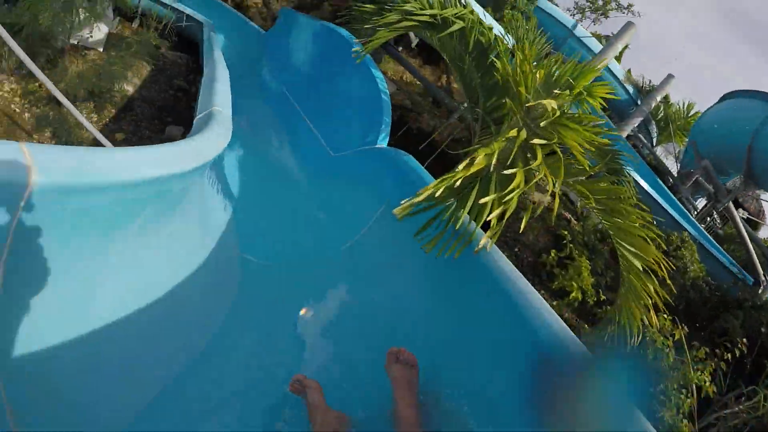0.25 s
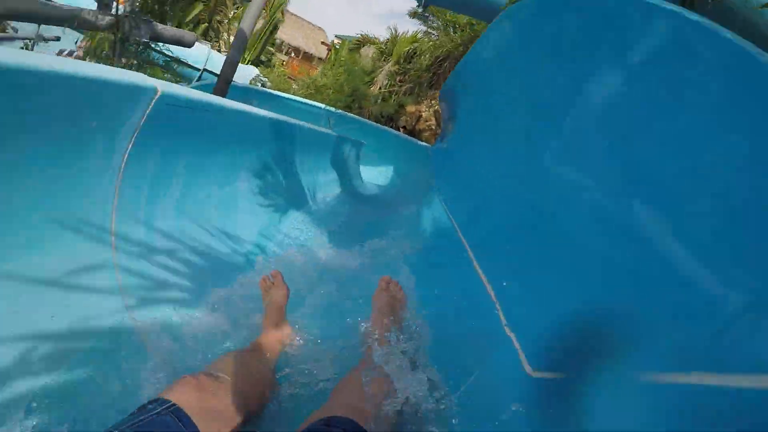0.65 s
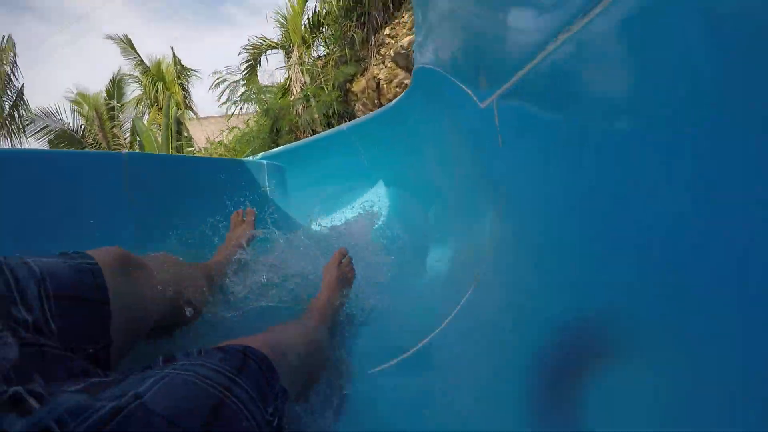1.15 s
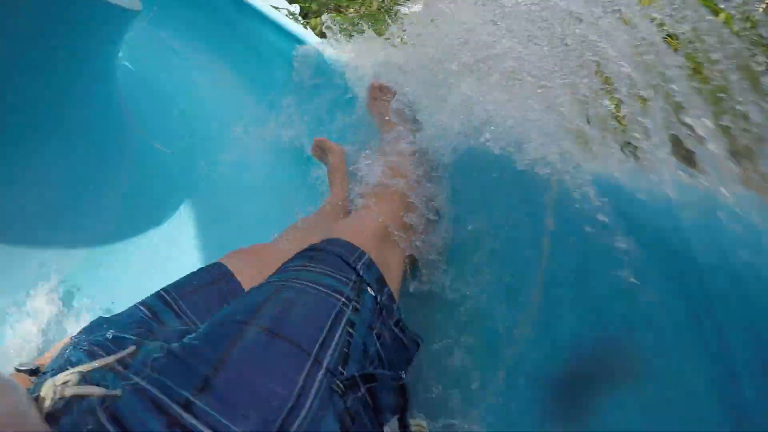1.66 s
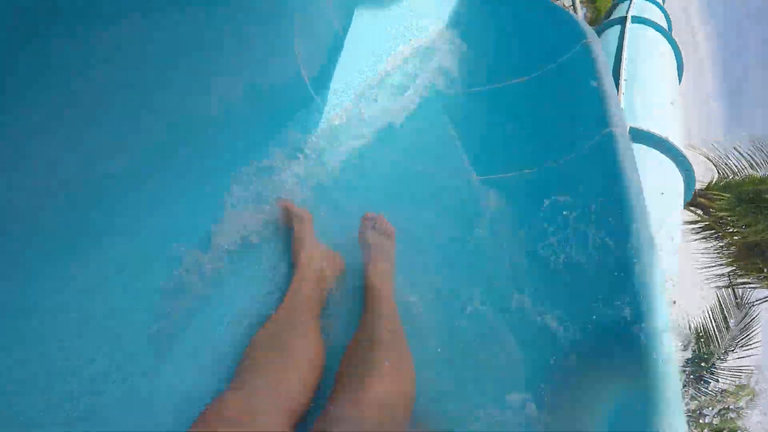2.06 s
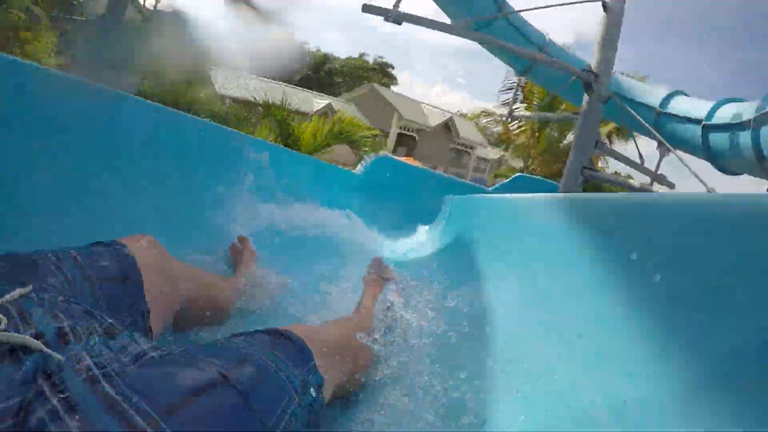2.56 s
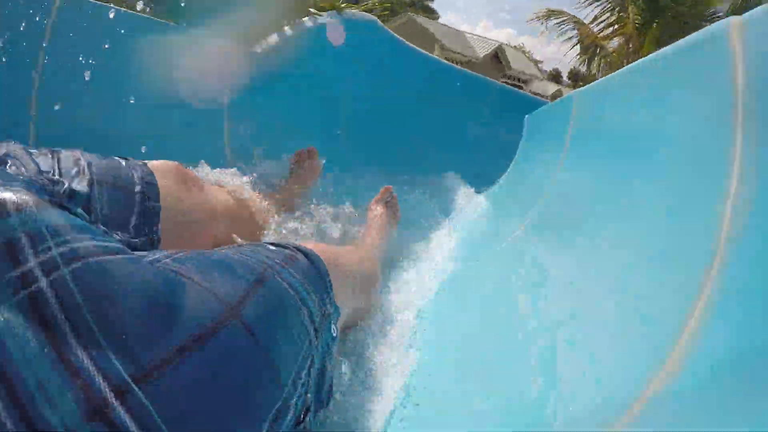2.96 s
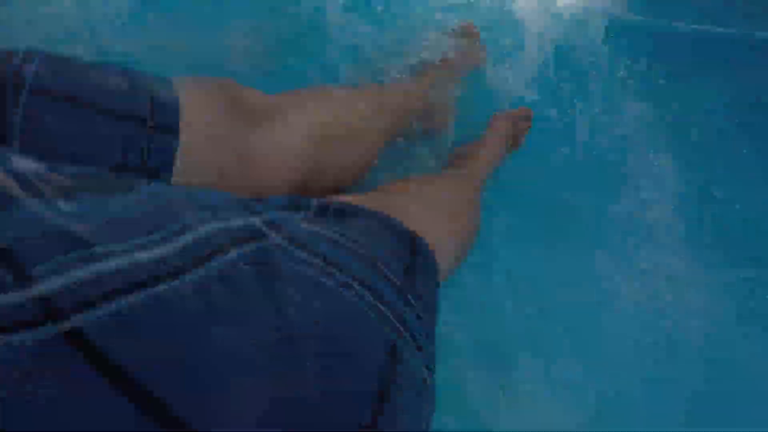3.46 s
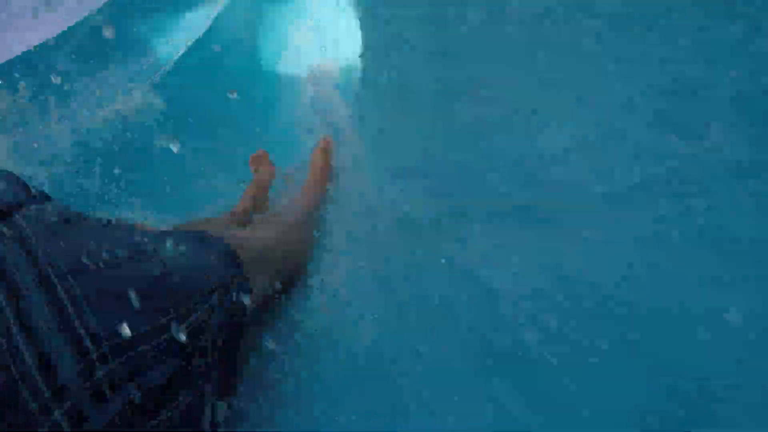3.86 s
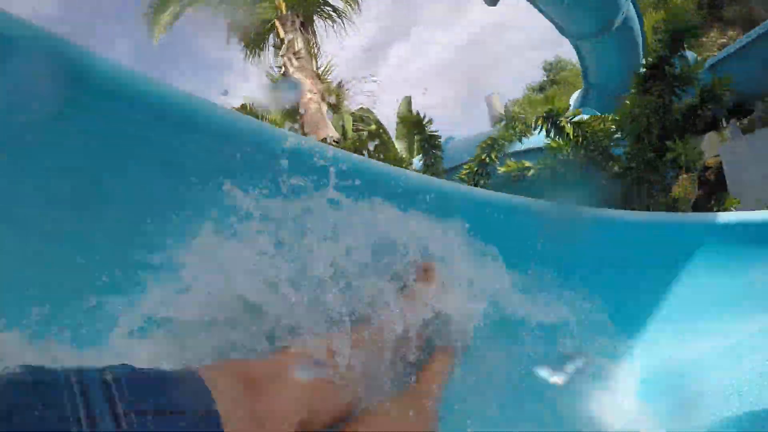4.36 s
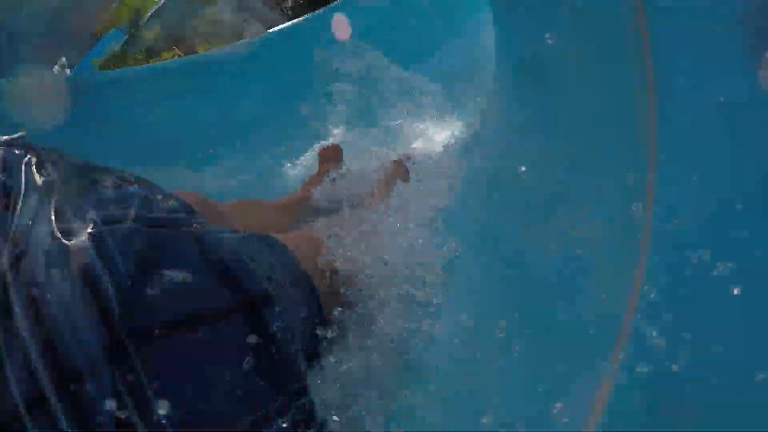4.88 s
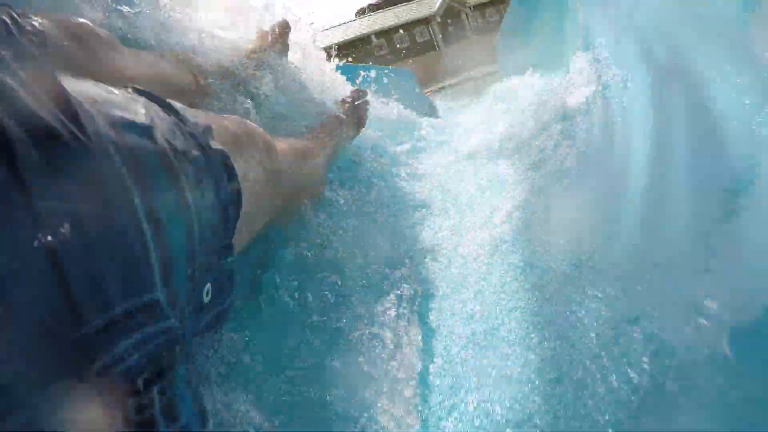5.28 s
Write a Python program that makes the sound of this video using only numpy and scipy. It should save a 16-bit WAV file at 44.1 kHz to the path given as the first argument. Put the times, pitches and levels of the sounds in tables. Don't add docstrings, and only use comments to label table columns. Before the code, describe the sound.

Outdoors on a water slide, heard at arm's length through a muffling case: constant uneven water rush with bubbles and spray. Deep pole thuds and short mount rattles hit hard after one second, again near two and a half, and thickest around three and a half. A momentary smothering follows, then a bright wet snap just after four seconds, and more bumps and splashing.

```python
import sys
import numpy as np
from scipy import signal
from scipy.fft import rfft, irfft, next_fast_len
from scipy.io import wavfile
from scipy.ndimage import uniform_filter1d, map_coordinates

SR = 44100
rng = np.random.default_rng(int(sys.argv[2]) if len(sys.argv) > 2 else 0)


def unload_wav(signal):
    wavfile.write(
        sys.argv[1],
        SR,
        np.round(np.clip(np.atleast_2d(signal).T, -1, 1) * 32767).astype(np.int16),
    )


def voltage_ratio(level):
    return 10 ** (np.asarray(level, float) / 20)


N = 243431


def unit(x):
    return x / np.sqrt(np.mean(x ** 2) + 1e-20)


def curves(rows):
    s, *cols = np.transpose(rows)
    return [np.interp(np.arange(N) / SR, s, c) for c in cols]


def wobble(rate):
    knots = rng.standard_normal(1200)
    return map_coordinates(knots, [np.arange(N) * rate / SR])


def coloured(x, spectrum):
    m = next_fast_len(N + 8192)
    hz, db = np.transpose(spectrum)
    gain = voltage_ratio(np.interp(np.log(np.fft.rfftfreq(m, 1 / SR) + 1), np.log(hz + 1), db))
    return unit(irfft(rfft(x, m) * gain, m)[:N])


def ring(t, hz, t60, attack):
    return np.sin(2 * np.pi * hz * t) * voltage_ratio(-60 * t / t60) * (1 - np.exp(-t / attack))


def add(track, s, sound):
    track[round(s * SR):][:len(sound)] += sound


def hush_db():
    t = np.arange(N) / SR
    covered_s, clear_s, edge_s = 3.79, 3.93, 0.015
    covers = 0.5 + 0.5 * np.tanh((t - covered_s) / edge_s)
    clears = 0.5 + 0.5 * np.tanh((t - clear_s) / edge_s)
    recovery_db = -5 * clears * np.exp(-np.abs((t - clear_s) / 0.06))
    return -15 * (covers - clears) + recovery_db


# time in seconds, shaking in dB,
# roughness of the slide in dB.
POLE = [(0, -29.5, -17), (.45, -23.5, -28), (.74, -22.5, 8.5), (1.29, -17, -17), (1.45, -39, 7),
        (1.6, -13, -12), (1.94, -36.5, -13), (2.4, -12.5, 0.5), (2.6, -26, 1), (2.89, -32, 1.5),
        (3.35, -19, 1), (3.56, -18, 5), (3.8, -25, 8), (4.12, -20, 6.5), (4.42, -38.5, 11.5),
        (4.64, -17, 1), (4.88, -29.5, 6.5), (5.52, -22, 0)]
# frequency in Hz, level in dB per Hz.
SWAY = [(4.7, -6), (8.0, 7.5), (43, 4.5), (62, -3), (90, -9), (120, -16), (200, -120)]
# frequency in Hz, level in dB per Hz.
SHUDDER = [(32, -14.5), (55, -11.5), (100, -16), (124, -22), (167, -20.5), (221, -19), (262, -39),
           (320, -45), (420, -31.5), (700, -120)]


def pole():
    sway_db, rough_db = curves(POLE)
    sway_db = sway_db + 0.78 * hush_db()
    shudder_db = sway_db + rough_db - 15.5
    sway = voltage_ratio(sway_db - 3.5 + 1.9 * wobble(35)) * coloured(rng.standard_normal(N), SWAY)
    shudder = voltage_ratio(shudder_db - 3.5 + 4.6 * wobble(21.98)) * coloured(rng.standard_normal(N), SHUDDER)
    return sway + shudder


# crest in seconds, peak in dB, cycle in ms, t60 in seconds.
SWINGS = [(0.642, -10, 29.3, 0.69), (.73, -7, 21.7, 0.31), (0.8, -9, 19.8, 0.25),
          (1.022, -10.5, 30.4, 0.37), (1.035, -4.5, 8.1, 0.031), (1.067, -6, 27.7, 0.37),
          (1.142, -2, 33.4, 0.21), (1.289, -1.5, 14.3, 0.069), (1.398, -2, 21.6, 0.23),
          (1.563, -1.5, 22.5, 0.17), (1.677, -11.5, 18.4, 0.46), (1.735, -8, 24.5, 0.31),
          (2.398, -2, 20.5, 0.027), (2.412, -2, 26, 0.16), (2.541, -7, 45, 0.11), (3.122, -4.5, 24.7, 0.19),
          (3.211, -7.5, 28, 0.14), (3.344, -10, 32, 0.35), (3.553, -5.5, 29, 0.14), (3.595, -2, 29, 0.11),
          (3.638, -2.5, 44, 0.11), (3.71, -2.5, 18.8, 0.072), (3.793, -5, 16.7, 0.022),
          (4.22, -8.5, 31.5, 0.1), (4.594, -1.5, 34.7, 0.22), (4.758, -3, 34, 0.079),
          (5.05, -5, 29.3, 0.39), (5.284, -10, 25, 0.31), (5.381, -1.5, 24, 0.18), (5.45, -6, 38, 0.091)]
# crest in seconds, peak in dB, cycle in ms.
LURCHES = [(0.037, -16.5, 33), (0.23, -18.5, 43), (0.432, -16, 34), (0.502, -8, 30.3), (0.564, -13, 46),
           (0.684, -10, 34), (0.767, -4, 35), (0.909, -18, 37), (.97, -20, 13), (1.191, -13, 51),
           (1.272, -11.5, 71), (1.346, -11, 33), (1.626, -22, 29), (1.657, -14, 28), (1.712, -21, 29),
           (1.843, -21.5, 52), (1.884, -18.5, 63), (2.12, -22, 62), (2.254, -22, 31), (2.291, -17.5, 37),
           (2.344, -11.5, 64), (2.451, -9, 68), (2.488, -9, 30), (2.943, -19.5, 31), (3.156, -21, 73),
           (3.279, -14, 40), (3.497, -32, 100), (3.741, -17, 51), (3.771, -20, 43), (3.961, -16.5, 43),
           (4.017, -21, 13), (4.071, -12, 25), (4.122, -18.5, 24), (4.163, -13, 23), (4.543, -19, 35),
           (4.627, -14, 40), (4.658, -31, 20), (4.716, -15, 73), (4.833, -24, 57), (4.978, -20, 26),
           (4.999, -12, 30), (5.135, -11.5, 36), (0.116, -24.5, 6.2), (2.0, -24.5, 46), (2.395, -5.5, 26),
           (3.418, -24, 7.2), (3.47, -30, 9.8), (3.514, -25, 9.3), (3.578, -10, 14), (5.03, -10.5, 8.3),
           (5.498, -24, 12), (0.136, -19.5, 30), (2.609, -21, 23), (3.9, -33, 30), (4.46, -26.5, 15),
           (5.326, -7.5, 46)]


def swings():
    lead = SR // 25
    out, t = np.zeros(N + SR), np.arange(-lead, SR // 3) / SR
    lurches = [(*row, 2.5 * row[2] / 1000) for row in LURCHES]
    for s, db, cycle_ms, t60 in SWINGS + lurches:
        turns = t / (cycle_ms / 1000) * (1 - 0.13 * np.tanh(t / 0.033))
        shape = np.where(t < 0, np.exp(-(1.83 * turns) ** 2), voltage_ratio(-60 * np.abs(t / t60)))
        add(out, s, voltage_ratio(db) * shape * np.cos(2 * np.pi * turns))
    return out[lead:][:N]


# start in seconds, peak in dB, case ring in dB re peak,
# cycle in ms.
JOLTS = [(0.114, -28, -14, 7.3), (0.475, -17.5, -31, 13.6), (1.0305, -8, -25, 7.4), (1.288, -4, -8.5, 5.75),
         (1.393, -11, -2, 4.1), (1.402, -9.5, -34, 9.2), (1.549, -16.5, -7, 10.5), (1.626, -31, -22, 1.6),
         (1.683, -25, -8, 4.5), (2.068, -37.5, 4, 4.5), (2.396, -25, 5, 3.8), (2.404, -3.5, -23, 5.67),
         (2.493, -20.5, 3.5, 6.2), (2.791, -32, 11, 6.6), (3.117, -22.5, 2, 5.3), (3.204, -22.5, -3, 3.46),
         (3.418, -22.5, -13, 5.3), (3.523, -25, -10, 6.1), (3.573, -13, -23, 7.5), (3.604, -10, 1.5, 4.9),
         (3.623, -21, -6, 4), (3.703, -4, -13, 6.2), (3.788, -9.5, -8.5, 4.54), (3.931, -21.5, -7, 7.5),
         (4.013, -15, 1, 9.2), (4.168, -15.5, 0, 10.6), (4.197, -24, -14, 5.2), (4.583, -20, -8, 9.8),
         (5.031, -25, -0.5, 4.7), (5.391, -21, -18, 3.87)]


def jolts():
    out, t = np.zeros(N + SR), np.arange(SR // 4) / SR
    case = ring(t, 222, t60=0.087, attack=0.014)
    for s, db, case_db, cycle_ms in JOLTS:
        t60 = (5.35 - 0.089 * db) * cycle_ms / 1000
        pitch = 1000 / cycle_ms * (0.5 + 0.5 * np.exp(-t / 0.013))
        snap = np.sin(2 * np.pi * np.cumsum(pitch) / SR) * voltage_ratio(-60 * t / t60) * (1 - np.exp(-t / 0.0048))
        add(out, s, -voltage_ratio(db + 12.5) * snap - voltage_ratio(db + case_db + 4.5) * case)
    return out[:N]


# start in seconds, peak in dB, main ring in Hz,
# upper ring in dB re peak.
RATTLES = [(1.317, -13.5, 650, -10), (1.329, -23, 640, -18), (1.445, -27, 710, -22), (1.623, -17, 335, -47),
           (2.447, -13, 610, -18), (2.463, -29, 1090, -4), (2.509, -23.5, 1430, 6), (3.521, -18, 1190, -5),
           (3.604, -8.5, 533, -13), (3.663, -18.5, 690, -18), (3.674, -14, 736, -12), (3.77, -23, 870, -10),
           (4.034, -18, 880, 1), (4.039, -21, 1310, -25), (4.826, -22, 1300, -3), (5.409, -20, 870, -5),
           (5.45, -23, 1070, -9), (1.412, -21, 1250, -1), (2.41, -27, 1380, -6), (3.975, -34, 1460, -8),
           (4.023, -28, 1400, -11), (4.059, -27, 1500, 0), (4.535, -29, 1500, 4)]
# start in seconds, peak in dB, main ring in Hz,
# upper ring in dB re peak.
KNOCKS = [(0.1, -30, 1140, -12), (1.031, -5, 690, -8), (1.288, -1, 660, -2.5), (1.408, -14.5, 955, -2),
          (1.787, -23, 1200, -5), (2.005, -31, 1000, -26), (2.07, -25.5, 650, -20), (2.354, -35, 463, 4),
          (2.406, -7, 543, -7), (3.099, -25.5, 1000, -18), (3.199, -23, 474, -7), (3.561, -13.5, 1110, -24),
          (3.61, -1.5, 450, -40), (3.621, -6.5, 835, -4), (3.705, -9.5, 520, -11), (4.165, -7, 1020, -16),
          (5.391, -11, 536, -8)]


def rattles():
    out, t = np.zeros(N + SR), np.arange(SR // 8) / SR
    soft = signal.butter(6, 2650, fs=SR, output="sos")
    middle = ring(t, 1250, t60=0.003, attack=0.0002)
    upper = ring(t, 2070, t60=0.0081, attack=0.00063)
    knocks = [(*row, 0.041 - 0.00036 * row[1], 12) for row in KNOCKS]
    loose = [(*row, 0.093, -1) for row in RATTLES]
    for s, db, hz, upper_db, t60, blow_db in knocks + loose:
        contacts = (rng.random(len(t)) < 0.03) * rng.standard_normal(len(t))
        chatter = contacts * voltage_ratio(-60 * t / t60)
        chatter[0] = voltage_ratio(blow_db)
        body = ring(t, hz, t60=0.012, attack=0.00031)
        body += voltage_ratio(upper_db + 4) * upper + voltage_ratio(upper_db / 2 + 6) * middle
        sound = signal.sosfilt(soft, signal.fftconvolve(chatter, body)[:len(t)])
        add(out, s, voltage_ratio(db + 0.5) * sound / np.abs(sound).max())
    return out[:N]


# start in seconds, peak in dB,
# ring in Hz, splat in dB re peak, top in dB re peak.
DROPS = [(0.3978, -15, 2840, -17, -30), (0.475, -24, 3060, -13, -20), (0.708, -30, 2700, -0.5, -13),
         (1.7441, -14.5, 2360, -13, -12), (2.212, -29, 4230, -9, -6), (2.379, -16.5, 2540, -16, -2),
         (2.3972, -7, 1940, -3.5, -13), (3.0373, -29.5, 2100, -8, -9), (3.5998, -6, 2300, -26, -27),
         (3.6107, -8, 3630, -1, -18), (3.622, -10, 2400, -5, -2), (4.0524, 2, 2200, -17.5, -23),
         (4.163, -1.5, 4700, -14, -21), (4.172, -20, 3100, 0.5, -11), (4.1851, -1.5, 3650, -6.5, -18),
         (4.1928, -9, 4770, -14, -22), (4.2283, -8.5, 2200, -29, -22), (5.438, -11.5, 1980, -15.5, -16),
         (5.488, -33.5, 2960, -2, -20)]
# start in seconds, peak in dB, ring in Hz, top in dB re peak.
MIST_DROPS = [(4.0505, -26, 5600, -1), (4.152, -29, 13000, 1), (4.161, -9.5, 6900, -5),
              (4.166, -21, 8800, 1), (4.18, -15, 10400, 2), (4.1811, -12, 7850, -8), (4.199, -32, 11000, 9),
              (4.223, -37, 12000, 3), (4.229, -21, 7960, -12), (5.387, -34, 11300, -3),
              (5.39, -30, 10000, -1), (5.395, -27, 10600, 1), (5.437, -15.5, 4020, -17)]


def drops():
    out, t = np.zeros(N + SR), np.arange(SR // 32) / SR
    middle = signal.butter(4, [1000, 5000], "bandpass", fs=SR, output="sos")
    top = signal.butter(3, [6000, 13800], "bandpass", fs=SR, output="sos")
    big = [(*row, abs(0.93 + 0.15 * row[1])) for row in DROPS]
    fine = [(s, db, hz, -9, top_db, 0.76) for s, db, hz, top_db in MIST_DROPS]
    for s, db, hz, splat_db, top_db, rise_ms in big + fine:
        a, b = rng.standard_normal((2, len(t)))
        splat = voltage_ratio(splat_db + 12.5) * signal.sosfilt(middle, a)
        crack = voltage_ratio(top_db) * signal.sosfilt(top, b)
        burst = np.sin(2 * np.pi * hz * t) + splat + crack
        u = 1000 * t / rise_ms
        tail = np.exp(rise_ms - 1000 * t)
        shape = np.where(u < 1, (u * np.exp(1 - u)) ** 2, tail)
        add(out, s, voltage_ratio(db - 5.5) * shape * burst)
    return out[:N]


# top in seconds, level in dB rms, centre in Hz,
# spread in ms.
SPLASHES = [(0.761, -47, 1120, 42), (1.01, -32.5, 3100, 24), (1.749, -34, 2450, 8.8),
            (2.384, -24, 3100, 7.5), (2.432, -36, 3220, 12), (2.514, -36, 1930, 7.8),
            (2.88, -47.5, 594, 64), (3.551, -45, 1160, 33), (4.05, -30.5, 1700, 23), (4.171, -35, 876, 18),
            (3.674, -25.5, 1000, 14), (4.52, -35, 860, 14), (4.574, -33, 2970, 38), (4.98, -36, 1530, 10),
            (4.908, -30.5, 1000, 8.1), (2.42, -30.5, 1810, 13), (5.03, -37, 506, 12), (2.8, -44, 605, 29),
            (3.931, -45.5, 600, 7.9), (4.858, -29.5, 1480, 23), (5.02, -47, 4930, 39),
            (5.4, -28.5, 1110, 14)]


def splashes():
    lead = SR // 8
    out, t = np.zeros(N + SR), np.arange(-lead, lead) / SR
    for s, db, hz, spread_ms in SPLASHES:
        droplets = (rng.random(len(t)) < 0.08) * rng.standard_normal(len(t))
        band = signal.butter(2, [hz / 2.08, hz * 1.36], "bandpass", fs=SR, output="sos")
        swell = np.exp(-(1000 * t / spread_ms) ** 2)
        add(out, s, voltage_ratio(db) * unit(signal.sosfilt(band, droplets)) * swell)
    return out[lead:][:N]


# middle in seconds, peak in dB, ring in Hz.
GLUGS = [(0.009, -36, 225), (0.025, -35, 480), (0.406, -41, 550), (0.536, -40, 360), (0.961, -29, 389),
         (1.007, -28, 570), (1.06, -24.5, 223), (1.101, -43, 300), (1.261, -30, 570), (1.547, -24, 186),
         (1.705, -29.5, 213), (1.733, -31, 376), (1.734, -42, 530), (1.819, -36, 554), (2.116, -37, 650),
         (2.506, -21.5, 192), (2.821, -43, 227), (2.831, -30.5, 614), (2.95, -37, 330), (2.975, -36.5, 217),
         (3.059, -39, 357), (3.256, -32, 223), (3.531, -30, 185), (3.592, -15, 220), (3.677, -25, 240),
         (3.789, -23.5, 560), (3.95, -34, 580), (4.064, -25, 600), (4.168, -23.5, 195), (4.296, -30, 206),
         (4.436, -39, 233), (4.516, -25.5, 643), (4.606, -32, 218), (4.612, -24.5, 567), (4.66, -34, 590),
         (4.729, -30, 200), (4.85, -32, 202), (4.9, -32, 232), (4.979, -31, 239), (5.273, -36, 212),
         (5.369, -32, 330), (5.419, -29, 320), (5.51, -38, 258)]
# middle in seconds, peak in dB, ring in Hz.
PLOPS = [(0.111, -39, 2060), (0.127, -35, 1140), (0.564, -48, 760), (0.673, -26, 1110), (0.749, -29.5, 806),
         (0.772, -30, 785), (0.923, -26, 1280), (0.946, -31, 1210), (1.318, -21, 1160), (1.354, -34, 1030),
         (1.675, -31, 1160), (1.702, -29.5, 1160), (1.875, -34, 2040), (2.034, -41, 765),
         (2.038, -34, 1070), (2.296, -26.5, 1130), (2.354, -26, 2330), (2.356, -36, 980),
         (2.393, -22, 1980), (2.418, -25, 754), (2.465, -23.5, 960), (3.271, -34, 1230),
         (3.345, -29.5, 1020), (3.441, -24.5, 1160), (3.478, -25, 1170), (3.525, -20, 1800),
         (3.548, -20, 1170), (3.567, -28, 1040), (3.694, -27, 2900), (4.036, -24, 760), (4.054, -24, 1100),
         (4.031, -20, 1960), (4.0348, -20, 1290), (4.1862, -18, 2170), (4.039, -29, 2200),
         (4.076, -33, 1180), (4.109, -32, 1740), (4.205, -22, 3940), (4.546, -28, 1170), (4.57, -19, 3100),
         (4.842, -25, 1344), (4.859, -31, 1360), (4.896, -34, 780), (4.978, -33, 980), (4.988, -29, 2050),
         (5.045, -32, 3950), (5.209, -38, 1180), (5.454, -27, 1990)]


def bubbles():
    lead = SR // 25
    out, t = np.zeros(N + SR), np.arange(-lead, lead) / SR
    for rows, cycles in ((GLUGS, 2.7), (PLOPS, 4.3)):
        for s, db, hz in rows:
            u = t * hz / cycles
            shape = np.exp(-np.where(u < 0, 3.0, 1.5) * u ** 2)
            tone = np.sin(2 * np.pi * cycles * u * (1 + 0.097 * u / 2))
            add(out, s, voltage_ratio(db) * shape * tone)
    return out[lead:][:N]


def foam(patchy_db, share, spike_db):
    z = signal.stft(rng.standard_normal(N), nperseg=512)[2]
    field = uniform_filter1d(rng.standard_normal(z.shape), 6, 0)
    field = uniform_filter1d(field, 8, 1)
    smooth = signal.istft(z * voltage_ratio(patchy_db * unit(field)), nperseg=512)[1][:N]
    size_db = np.minimum(spike_db * rng.exponential(size=N), 16)
    bursts = (rng.random(N) < 0.03) * rng.standard_normal(N) * voltage_ratio(size_db)
    return unit(smooth) + share * unit(bursts)


# time in seconds, flow in dB,
# froth in dB (white water against heavy water).
FLOW = [(0, -39, -2.5), (.16, -46.5, 0.5), (.41, -41, -0.5), (.62, -38.5, -1), (.89, -34.5, -1.5),
        (1.4, -34, -3), (1.64, -40.5, -2), (1.83, -44.5, 0.5), (2.04, -48, 3), (2.26, -38.5, 1.5),
        (2.56, -42, -4.5), (2.8, -47.5, -2), (3.2, -42, -2), (3.5, -35, 4), (3.76, -41, -2.5),
        (4.2, -38.5, 0.5), (4.65, -38.5, 1.5), (5.52, -45, -2)]
# crest in seconds, rise in dB, spread in ms.
WAVES = [(.15, 5, 32), (.5, 0.5, 35), (.9, -0.5, 81), (1.748, 4.5, 61), (2.12, 1, 31), (2.4, 8.5, 44),
         (2.47, 4.5, 36), (2.92, 3, 66), (3.57, 4.5, 37), (4.02, 4, 60), (4.52, 1.5, 52), (4.9, 1.5, 110),
         (5.0, 2.5, 44), (5.45, 3.5, 120), (1.135, 1, 20), (1.2, -1.5, 35), (1.93, -1.5, 35),
         (2.698, -0.5, 35), (3.645, 1, 13), (4.31, -2.5, 46), (4.68, -2.5, 31), (4.77, 1, 35),
         (5.14, -3, 43)]


def rushing_db():
    t = np.arange(N) / SR
    waves_db = sum(db * np.exp(-(1000 * (t - s) / ms) ** 2) for s, db, ms in WAVES)
    return curves(FLOW)[0] + hush_db() + waves_db


# frequency in Hz, level in dB per Hz.
GURGLE = [(150, -5), (260, -4), (381, -3.5), (461, -3), (606, -2), (800, -15), (1040, -4), (1760, -120)]
RUSH = [(410, -33), (700, -5), (760, -7), (1100, 1.5), (1260, -2), (1480, -9.5), (2040, -3.5), (2300, -9),
        (3200, -9), (4160, -19.5), (7040, -120)]
SPRAY = [(1710, -5), (2900, -6.5), (3230, -2), (3490, -4), (3900, -4), (4450, -1.5), (5160, -10.5),
         (6480, -9.5), (7040, -13), (8170, -11.5), (8800, -24), (11400, -47), (19400, -120)]
MIST = [(4880, -51), (8300, -9), (8710, 1), (9760, -1), (10600, 1.5), (12100, -4.5), (13100, -1),
        (14800, -8), (15350, -12), (15650, -45)]


def water():
    rush_db, froth_db = rushing_db(), curves(FLOW)[1]
    gurgle_db = rush_db - 4 + 0.14 * (rush_db + 40) - 0.062 * froth_db
    gurgle_db += 0.11 * (curves(POLE)[0] + 31.5)
    spray_db = rush_db - 0.57 + froth_db
    mist_db = spray_db - 17.5 + 0.2 * (spray_db + 40)

    surge = 1.59 * wobble(9) + 0.35 * wobble(40)
    gurgle = voltage_ratio(gurgle_db + surge + 1.1 * wobble(25.01))
    gurgle *= coloured(foam(patchy_db=3.5, share=0.65, spike_db=3.0), GURGLE)
    rush = voltage_ratio(rush_db + surge + 0.3 * wobble(20))
    rush *= coloured(foam(patchy_db=2.0, share=0.48, spike_db=2.5), RUSH)
    surge_top = 0.71 * surge + 1.23 * wobble(70)
    spray = voltage_ratio(spray_db + surge_top) + voltage_ratio(-62.5)
    spray *= coloured(foam(patchy_db=1.0, share=0.5, spike_db=6.0), SPRAY)
    mist = voltage_ratio(mist_db + surge_top) + voltage_ratio(-70.5)
    mist *= coloured(foam(patchy_db=0.0, share=0.63, spike_db=3.0), MIST)
    return gurgle + rush + spray + mist


def scene():
    wet = water() + splashes() + drops()
    handling = pole() + swings() + jolts() + rattles()
    return (wet + handling + bubbles())[None]


def band_limit(x):
    return signal.sosfilt(signal.butter(12, 15950, fs=SR, output="sos"), x)


def record(dry):
    top, knee = 0.95, 5
    limited = dry / (1 + np.abs(dry / top) ** knee) ** (1 / knee)
    edge = signal.ellip(8, 0.1, 60, 15850, fs=SR, output="sos")
    mix = signal.sosfilt(edge, limited - limited.mean())
    return band_limit(mix)


dry = scene()
out = record(dry)
unload_wav(out)
```